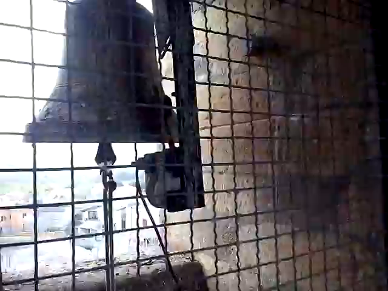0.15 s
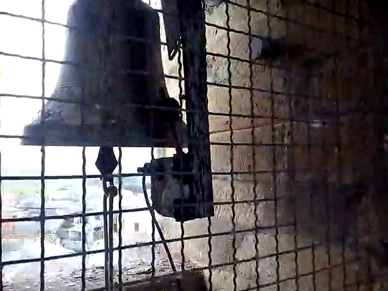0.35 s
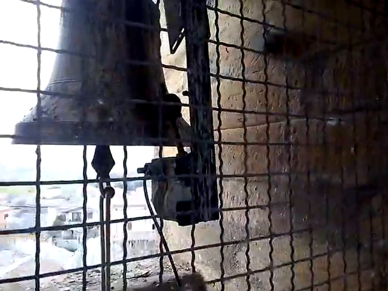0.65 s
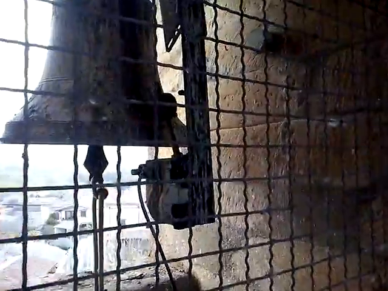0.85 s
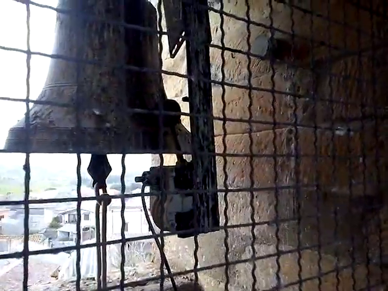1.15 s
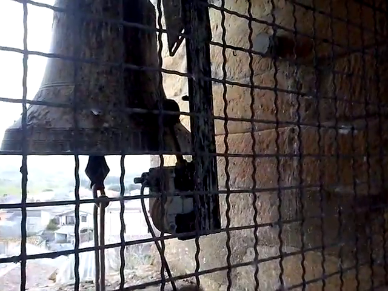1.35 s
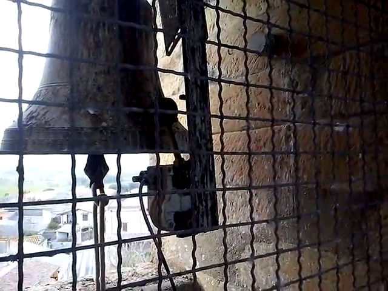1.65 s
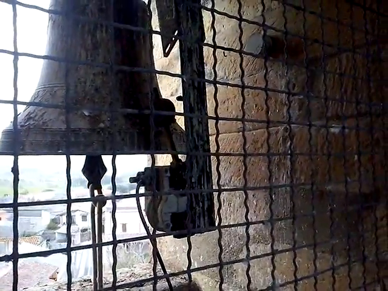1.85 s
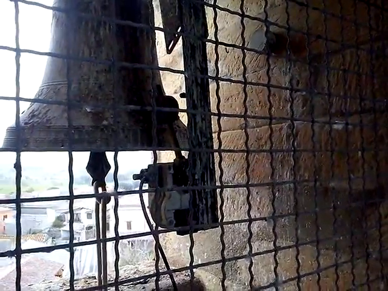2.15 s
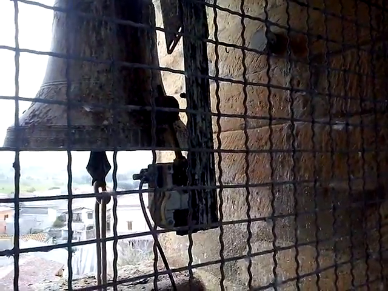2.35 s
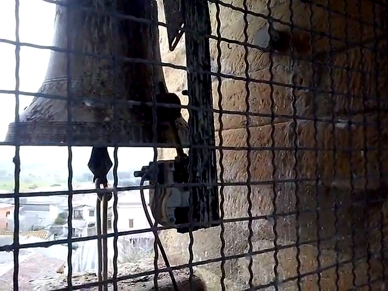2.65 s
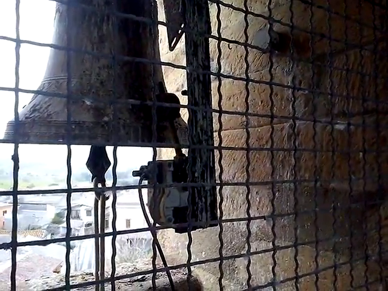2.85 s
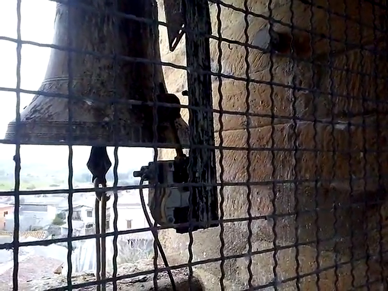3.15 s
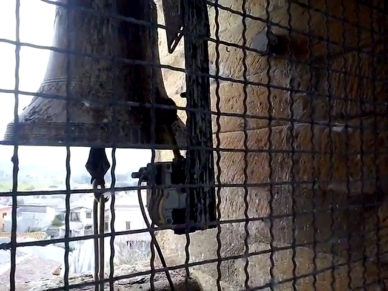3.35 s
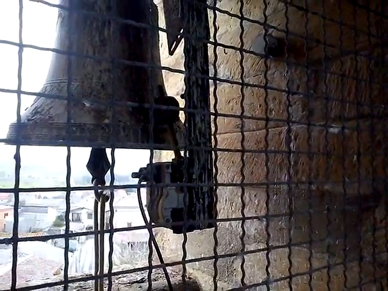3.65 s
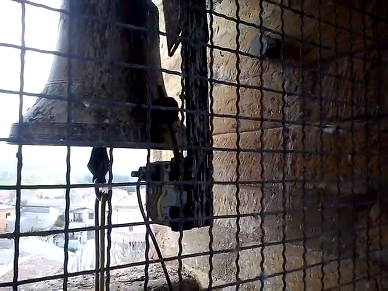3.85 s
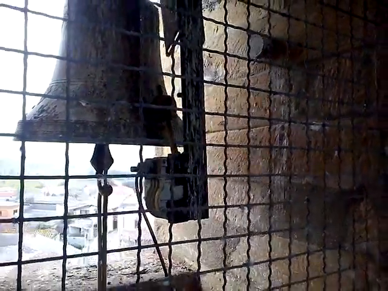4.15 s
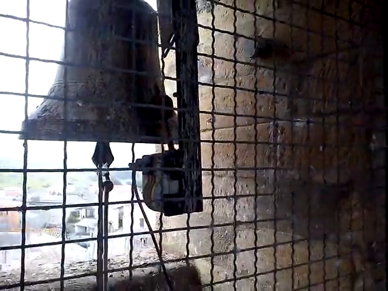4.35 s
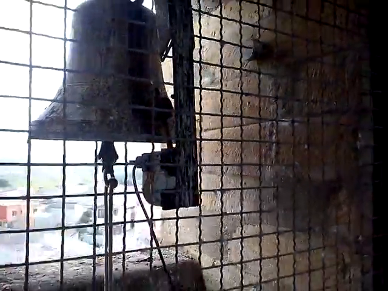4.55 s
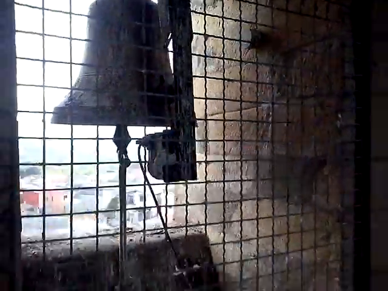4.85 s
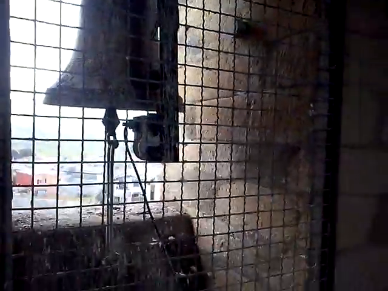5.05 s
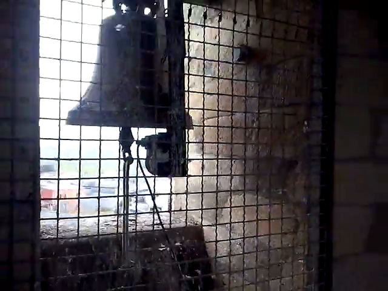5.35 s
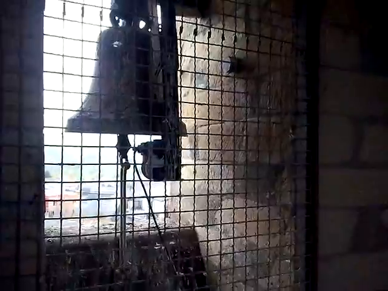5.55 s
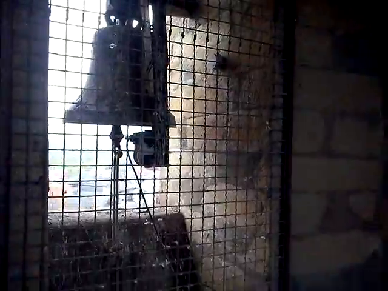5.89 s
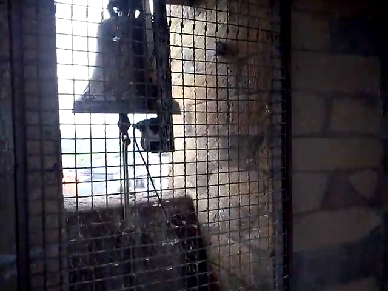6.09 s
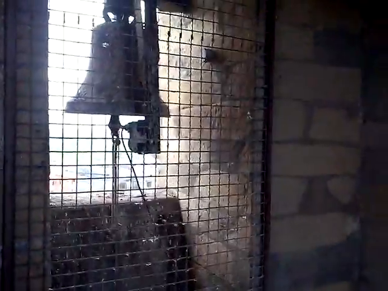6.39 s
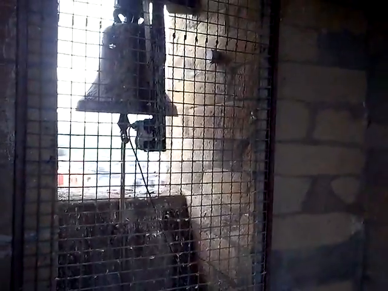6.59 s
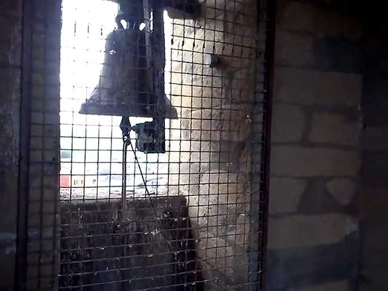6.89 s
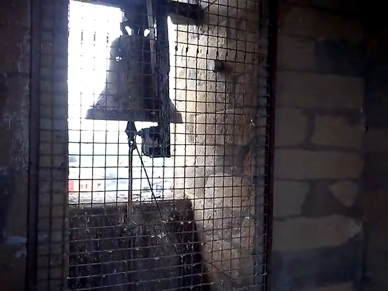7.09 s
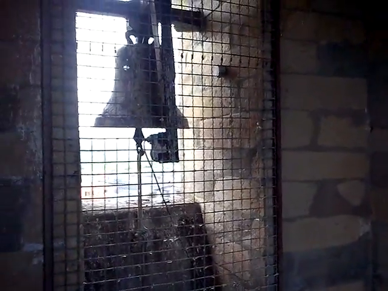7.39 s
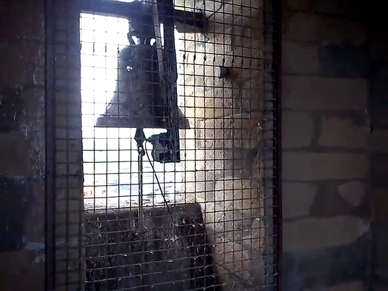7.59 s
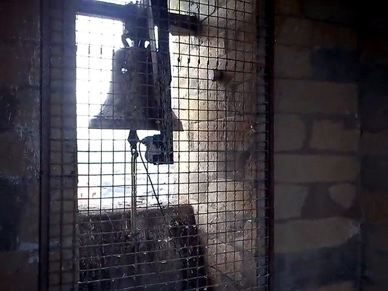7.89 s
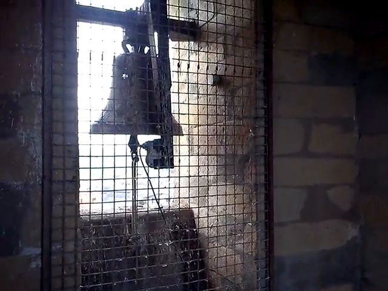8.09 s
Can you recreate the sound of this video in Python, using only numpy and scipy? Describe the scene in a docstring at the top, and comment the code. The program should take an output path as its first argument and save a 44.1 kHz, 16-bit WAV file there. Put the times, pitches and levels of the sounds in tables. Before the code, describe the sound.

Inside a stone bell tower, a large bronze bell is already ringing loudly. Two more evenly spaced hammer strokes follow, each with a small click, a hard metallic tick and a harsh clipped clang. The tones waver as the handheld microphone moves. After the last stroke a deep hum remains while shoes scrape, clothes rub and one heavy bump sounds. Town murmur and birds are very faint.

```python
"""A big bronze bell is already ringing; two more strokes follow, each with a click, a tick and harsh clipping.
The bell is a sum of fading sine tones that sway as the microphone is carried through standing waves.
An electric hammer adds bursts of coloured noise and a short high tone at each stroke.
Steps, sliding soles, rubbing clothes and one heavy bump are shaped noise with a short stone-wall tail.
Far behind, noise makes the murmur and drone of a town, and gliding whistles make faint birds."""
import sys
import numpy as np
from scipy import signal
from scipy.fft import rfft, irfft, next_fast_len
from scipy.io import wavfile
from scipy.ndimage import map_coordinates

SR = 44100
rng = np.random.default_rng(int(sys.argv[2]) if len(sys.argv) > 2 else 0)


def wrap_up_sound(samples):
    """Save the sound to the file named by the first command line argument, as 16-bit audio."""
    columns = np.atleast_2d(samples).T
    # keep every value between -1 and 1, then stretch to whole-number steps
    tamed = np.clip(columns, -1, 1)
    steps = np.round(tamed * 32767).astype(np.int16)
    wavfile.write(sys.argv[1], SR, steps)


N = 362943
T = np.arange(N) / SR  # time of each sample, in seconds
# Levels in the tables and settings are relative: the loudness curve in scene() comes on top.


def undb(db):
    """Turn decibels into a gain."""
    return 10 ** (np.asarray(db) / 20)


def curve(rows):
    """Join rows of (t/s, value) by straight lines."""
    return np.interp(T, *np.transpose(rows))


def fade(start, t60):
    """Silence, then an exponential decay that drops 60 dB in t60 seconds."""
    elapsed = np.maximum(T - start, 0)
    return (T >= start) * np.exp(-np.log(1000) * elapsed / t60)


def swells(rows):
    """Add up bell-shaped rises and falls from rows of (peak t/s, level/dB, half length/s)."""
    return sum(undb(db) * np.exp(-((T - peak) / half) ** 2) for peak, db, half in rows)


def noise(spectrum):
    """Noise of unit rms, coloured by rows of (f/Hz, level/dB)."""
    hz, db = np.transpose(spectrum)
    size = next_fast_len(N, True)
    bins = np.maximum(np.fft.rfftfreq(size, 1 / SR), 1)
    gain = undb(np.interp(np.log(bins), np.log(hz), db))
    coloured = irfft(gain * rfft(rng.standard_normal(size)))[:N]
    return coloured / coloured.std()


def walk(position):
    """Random values joined by straight lines, a new one for each unit of position."""
    return map_coordinates(rng.standard_normal(4096), [position], order=1, mode="wrap")


# colour of the town's murmur: f/Hz, level/dB
TOWN_COLOUR = [(15, -36), (30, -24), (60, -7.5), (120, -9), (250, -4.5), (500, -8), (1300, -12),
               (2500, -12.5), (5500, -16), (7500, -29.5)]
# loudness of the low drone: t/s, level/dB
DRONE_LEVEL = [(0, -63), (1.2, -63), (2.2, -75), (4.4, -75.5), (4.7, -64), (8.2, -59.5)]
# colour of the low drone: f/Hz, level/dB
DRONE_COLOUR = [(60, -29.5), (100, -19.5), (120, 7.5), (140, -19), (250, -34), (1000, -70.5)]


def town(murmur_db=-59.5, flicker_db=2.5, flickers_per_s=3):
    """Broad noise that rises and falls at random is the murmur; a narrow low band is the drone."""
    murmur = undb(murmur_db + flicker_db * walk(T * flickers_per_s)) * noise(TOWN_COLOUR)
    return murmur + undb(curve(DRONE_LEVEL)) * noise(DRONE_COLOUR)


def chirp(start, start_hz, end_hz, length, db):
    """A bird's whistle: a sine that glides between two pitches, wavers, swells and fades."""
    part = np.linspace(0, 1, max(int(length * SR), 2))  # from 0 to 1 along the call
    waver = 110 * walk(part * length * 400)  # Hz, with 400 new values per second
    hz = start_hz + (end_hz - start_hz) * part + waver
    call = undb(db) * np.sin(np.pi * part) * np.sin(2 * np.pi * np.cumsum(hz) / SR)
    return np.pad(call, (int(start * SR), N))[:N]


# single bird calls: t/s, start f/Hz, end f/Hz, length/s, level/dB
BIRD_CALLS = [(1.07, 5320, 4260, .06, -57), (2.99, 4970, 4820, 0.097, -63), (5.52, 4700, 4080, 0.033, -69),
              (5.6, 4500, 3730, 0.032, -70), (5.76, 3700, 3000, .05, -70), (5.82, 3200, 2670, 0.039, -55),
              (7.72, 4100, 3900, .06, -54.5), (7.85, 5000, 4750, 0.087, -64),
              (8.1, 3880, 4120, 0.062, -55.5)]


def birds(flock_db=-73, flock_hz=5000, count=45):
    """A few set calls, plus a faint flock whose falling chirps come at random moments."""
    flock = []
    for when, pitch, fall, size in rng.random((count, 4)):
        start_hz, end_hz = flock_hz * (1 + pitch / 5), flock_hz * (1 - fall / 4)
        length = 0.067 + 0.054 * size  # larger draws are longer and louder
        flock.append((when * N / SR, start_hz, end_hz, length, flock_db + 6 * size))
    return sum(chirp(*row) for row in list(BIRD_CALLS) + flock)


# sleeves brushing along: peak t/s, centre f/Hz, level/dB, half length/s
SWISHES = [(5.6, 1373, -54.5, 0.34), (7.55, 2060, -54.5, .3), (7.58, 4830, -56, .25)]


def sleeves(width=1.3, skirt_db=-22):
    """Each swish is one narrow band of cloth hiss that swells and fades."""
    out = np.zeros(N)
    for peak, hz, db, half in SWISHES:
        band = [(hz / width ** 3, 3 * skirt_db), (hz / width, skirt_db), (hz, 0),
                (hz * width, skirt_db), (hz * width ** 3, 3 * skirt_db)]
        out += swells([(peak, db, half)]) * noise(band)
    return out


# steps and bumps on the floor: t/s, scrape level/dB, thud level/dB, t60/s
STEPS = [(5.191, -46.5, -79, 0.25), (5.375, -48.5, -77, 0.23), (5.752, -44.5, -83, 0.17),
         (6.005, -50.5, -66, 0.29), (6.22, -43.5, -55, 0.58), (6.381, -39.5, -42.5, 0.28),
         (6.435, -38.5, -42.5, 0.4), (6.491, -22.5, -18.5, 0.53), (6.525, -25, -25, 0.25),
         (6.59, -28.5, -25, 0.46), (6.892, -30.5, -64, 0.12), (6.927, -43.5, -45.5, 0.48),
         (7.168, -48.5, -70, 0.49), (7.25, -45.5, -58, 0.47), (7.369, -66, -39.5, 0.14)]
# a sole sliding on gritty stone: peak t/s, level/dB, half length/s
SLIDES = [(6.3, -46.5, 0.022), (6.41, -37, 0.026), (6.54, -33.5, 0.098), (6.74, -40, .08),
          (7.22, -55.5, 0.089)]
# clothes rubbing as the body moves: peak t/s, level/dB, half length/s
RUSTLES = [(5.6, -61, 0.58), (6.25, -53.5, 0.5), (6.63, -43.5, 0.32), (7.4, -51.5, 0.48)]
# colour of the scraping step: f/Hz, level/dB
SCRAPE_COLOUR = [(30, -37), (100, -22), (400, 0), (1000, -0.5), (1500, 0), (2200, 4), (2800, -3.5),
                 (3500, -9.5), (6500, -12), (8000, -35.5)]
# colour of the floor's thud: f/Hz, level/dB
THUD_COLOUR = [(15, -37), (35, -20), (70, -18.5), (130, -8.5), (195, 11.5), (300, 0.5), (450, -2.5),
               (800, -5), (1500, -27.5)]
# colour of the sliding sole: f/Hz, level/dB
GRIT_COLOUR = [(100, -33), (900, 0.5), (1600, -4.5), (2900, -1.5), (4000, -2.5), (6000, 3.5), (7200, -8)]
# colour of the rubbing clothes: f/Hz, level/dB
RUB_COLOUR = [(20, -34), (60, -13), (180, 3.5), (500, 1), (1200, 2.5), (1600, 1.5), (2100, 3), (3300, -17),
              (5000, -9.5), (7000, -10.5)]


def feet(grit_db=2.0, grit_per_s=180, room_db=-20, room_t60=1.0):
    """Soles scrape and slide, clothes rub and the floor thuds; the stone walls add a short tail."""
    scrape = sum(undb(db) * fade(start, t60) for start, db, _, t60 in STEPS)
    thud = sum(undb(db) * fade(start, t60) for start, _, db, t60 in STEPS)
    friction = scrape * noise(SCRAPE_COLOUR)
    friction += swells(SLIDES) * noise(GRIT_COLOUR)
    friction += swells(RUSTLES) * noise(RUB_COLOUR)
    catching = undb(grit_db * walk(T * grit_per_s))  # friction grips and lets go
    direct = catching * friction + thud * noise(THUD_COLOUR) + sleeves()
    tail = rng.standard_normal(N) * fade(.015, room_t60)  # begins 15 ms after the direct sound
    tail /= np.linalg.norm(tail)
    return direct + undb(room_db) * signal.fftconvolve(direct, tail)[:N]


# hammer strokes, also used by bell(): t/s, force level/dB, brightness/(dB per octave)
STROKES = [(-.127, 0.5, 0.5), (1.67, -1.5, 0.5), (3.4723, 0, 0)]
# colour of the many short-lived bell modes: f/Hz, level/dB
CLANG_COLOUR = [(200, -31.5), (900, -7.5), (1800, 5.5), (2800, -9), (5000, -4.5), (7500, -13.5)]
# colour of the latch's click: f/Hz, level/dB
LATCH_COLOUR = [(300, -23.5), (1500, -9.5), (3500, -7.5), (6500, 6), (7500, -5)]
# colour of the hammer's swing: f/Hz, level/dB
SWING_COLOUR = [(300, -15.5), (1000, 1.5), (2200, -0.5), (3200, -7.5), (7500, -44.5)]


def hammer(tick_db=6, tick_hz=5000, tick_t60=0.018, clang_db=2, clang_t60=0.7,
           lift_s=0.077, latch_db=-37, latch_t60=0.31, swing_db=-30):
    """The drive clicks and swings the hammer; iron meets bronze with a tick and a wash of modes."""
    clang, latch, swing = noise(CLANG_COLOUR), noise(LATCH_COLOUR), noise(SWING_COLOUR)
    out = np.zeros(N)
    for hit, force, _ in STROKES:
        out += undb(latch_db) * latch * fade(hit - lift_s, latch_t60)
        from_mid_swing = (T - hit + lift_s / 2) / (lift_s / 2)
        out += undb(swing_db) * swing * np.exp(-2 * from_mid_swing ** 2)
        tick = np.sin(2 * np.pi * tick_hz * (T - hit))
        out += undb(force + tick_db) * tick * fade(hit, tick_t60)
        out += undb(force + clang_db) * clang * fade(hit + 0.0028, clang_t60)
    return out


# the bell's tones; the last six are close pairs that shimmer: f/Hz, level/dB, t60/s
PARTIALS = [(317.9, -29, 25), (601.6, -22, 14), (722.7, -12, 11), (960, -32, 3.2), (1211.3, -4.5, 4.3),
            (1532.5, -5, 1.6), (1591, -25, 1.8), (1652, -8, 2), (1816.6, 3, 1.9), (2504.7, 10, 1.8),
            (2551, -16, 1.4), (2637, -6, 1.1), (2739, -13, 1.4), (2815.5, -11, 1.6), (3194, -11, .7),
            (3394, -16, 1.1), (3644, -23, 1.5), (3837, -24, 1.3), (4043, -3.5, 1.55), (4662, -20, 1.1),
            (5663.5, -6, 1.25), (7051, -25, 1.1), (7259, -15, 1), (3231, -17, 1.8), (3255, -2, 1.9),
            (4825, -26, 1.9), (4851.5, -2, 1.25), (6417, -25, 1.7), (6467, -15, 1.25)]
# hum, the lowest tone, as it reaches the microphone: t/s, level/dB
HUM_LEVEL = [(0, -4), (1.55, 7), (2.202, 2), (3.25, -10.5), (3.7, 3), (4.622, 2.5), (5.101, 8.5),
             (6.35, 7.5), (6.898, 14.5), (8.2, 13.5)]
# prime, the second tone, as it reaches the microphone: t/s, level/dB
PRIME_LEVEL = [(0, 12.5), (.5, 12), (1.8, -2.5), (2.6, -4), (4.1, -3), (5.501, 10), (6.1, 1), (6.8, 8.5),
               (8.202, 7)]
# tierce, the third tone, as it reaches the microphone: t/s, level/dB
TIERCE_LEVEL = [(0, -4), (.45, -6.5), (.95, 8), (1.669, 12.5), (1.708, -2.5), (2.099, 2), (3.9, 4),
                (4.6, -2), (6.05, -8.5), (6.45, 4.5), (8.2, 5)]
# which long-ringing tone each of these levels belongs to: f/Hz, level rows
LONG_RINGING = [(318, HUM_LEVEL), (601, PRIME_LEVEL), (723, TIERCE_LEVEL)]
# the microphone crosses a node (quiet spot) of one tone: t/s, f/Hz, depth level/dB, half width/s
NODES = [(.01, 2505, -16.5, 0.14), (.37, 1817, -12, 0.035), (.38, 1652, -14, 0.087), (.43, 2505, -6, 0.05),
         (0.489, 3255, -14.5, 0.028), (.6, 4043, -17.5, 0.22), (1.19, 2505, -23.5, 0.39),
         (2.301, 3255, -12.5, 1.4), (1.9, 1211, -3, 0.81), (4.171, 2505, -23.5, 0.24),
         (4.35, 1652, -18, .35), (4.449, 3255, -8.5, 0.11), (4.52, 1532, -14.5, .13),
         (4.7, 4043, -11.5, .3), (4.7, 2505, -9.5, 0.16), (4.76, 3255, -12, .08), (4.8, 723, -23.5, 0.19),
         (4.87, 1211, -11.5, .07), (4.88, 2505, -19, 0.055), (5.0, 1817, -16, 0.059),
         (5.1, 3280, -18.5, 0.046), (5.179, 2505, -14.5, 0.099), (5.369, 2505, -8.5, 0.037),
         (5.5, 1211, -17.5, 0.59), (5.92, 1211, -12, 0.11), (6.2, 723, -9.5, 0.075)]


def standing_wave(hz):
    """Gain of one tone at the microphone: it dips at a node and grows with the distance from it."""
    gain = np.ones(N)
    for centre, rows in LONG_RINGING:
        if abs(hz / centre - 1) < .006:
            gain *= undb(curve(rows))
    for crossing, node_hz, depth_db, half in NODES:
        nearest_hz = min((row[0] for row in PARTIALS), key=lambda f: abs(f - node_hz))
        if hz == nearest_hz:
            away = ((T - crossing) / half) ** 2
            gain *= np.sqrt((away + undb(depth_db) ** 2) / (away + 1))
    return gain


# how fast the microphone is carried: t/s, pace from 0 to 1
PACE = [(0, 0.52), (.7, 0.97), (1.3, 0), (3.6, 0.76), (4.2, 0.97), (8.2, .5)]
# the prime's twin, compared with the prime: t/s, level/dB
TWIN_LEVEL = [(0, -20), (1.5, -5), (3.3, -3), (5.5, -18), (8.2, -13)]


def bell(wander_db=6.0, wander_hz=3500, nodes_per_s=6, build_s=0.0097, prime_hz=601, beat_hz=2.64):
    """Each stroke adds energy to every tone of the bell; the belfry's standing waves make them sway."""
    pace = np.abs(curve(PACE))
    path = np.cumsum(pace) / SR * nodes_per_s  # nodes_per_s holds at full pace
    # wall reflections pile up after each stroke
    blooms = [1 - np.exp(-np.maximum(T - hit, 0) / build_s) for hit, _, _ in STROKES]
    turns = 2 * np.pi * (T - STROKES[-1][0])
    out = np.zeros(N)
    for hz, db, t60 in PARTIALS:
        octaves = np.log2(hz / 1211)  # brightness tilts the levels around 1211 Hz
        energy = np.zeros(N)
        for (hit, force, bright), bloom in zip(STROKES, blooms):
            energy += (undb(force + bright * octaves) * bloom * fade(hit, t60)) ** 2
        shortness = min(hz / wander_hz, 1)  # short waves sway faster and further
        drift = np.minimum(walk(path * shortness), 1)  # nodes are deep, crests are shallow
        sway_db = wander_db * shortness * pace * drift
        tone = np.cos(hz * turns)
        if abs(hz - prime_hz) < 10:  # the bell is not quite round, so the prime warbles
            tone += undb(curve(TWIN_LEVEL)) * np.cos((hz - beat_hz) * turns)
        out += undb(db + sway_db) * standing_wave(hz) * np.sqrt(energy) * tone
    return out


# loudness of everything together, highest near the end: t/s, level/dB
LOUDNESS = [(0, 1.5), (2.5, 1), (3.45, 6.5), (3.7, 0.5), (4.43, 3.5), (5.1, 10.5), (8.2, 10.5)]


def scene():
    """Town, birds, feet, hammer and bell add up at one microphone, under one loudness curve."""
    mix = town() + birds() + feet() + hammer() + bell()
    return (undb(curve(LOUDNESS)) * mix)[None]


def low_pass(x, hz):
    """Steep filter that removes what lies above hz."""
    return signal.sosfilt(signal.ellip(10, .2, 70, hz, fs=SR, output="sos"), x)


def record(dry, input_limit=0.69, output_limit=0.7, recorder_rate=16000, band_hz=7500, top_hz=15850):
    """Clipping at a low sampling rate folds overtones back; the overshoot clips again at the output."""
    sampled = signal.resample_poly(low_pass(dry, band_hz), recorder_rate, SR, axis=1)
    clipped = np.clip(sampled, -input_limit, input_limit)
    played = signal.resample_poly(clipped, SR, recorder_rate, axis=1, window="blackmanharris")[:, :N]
    return low_pass(np.clip(played, -output_limit, output_limit), top_hz)


dry = scene()
out = record(dry)
wrap_up_sound(out)
```